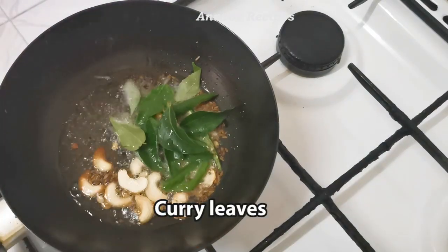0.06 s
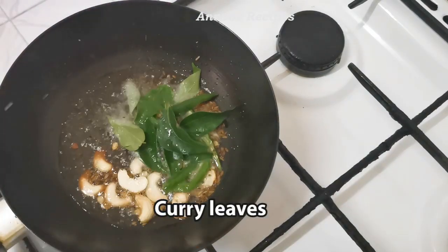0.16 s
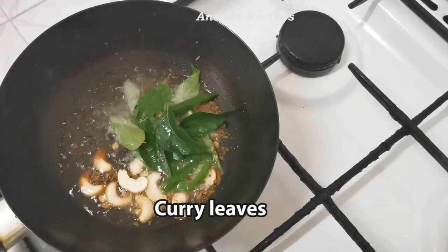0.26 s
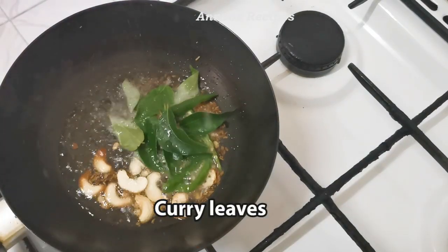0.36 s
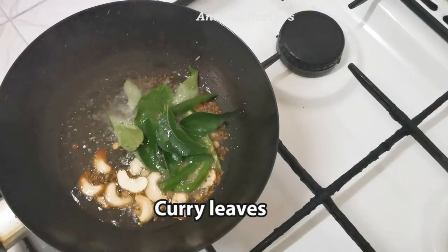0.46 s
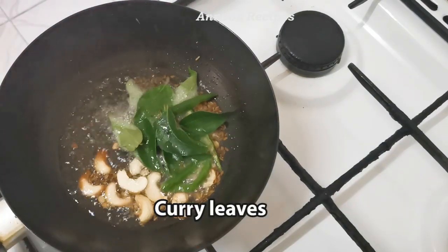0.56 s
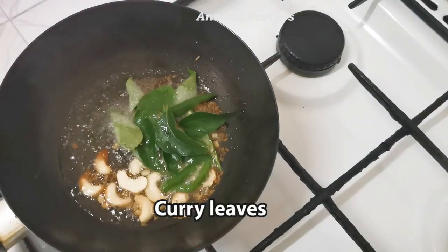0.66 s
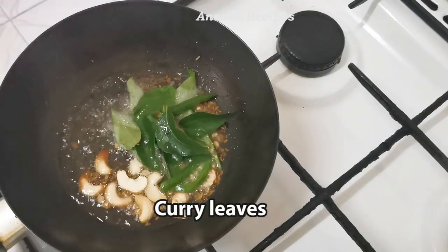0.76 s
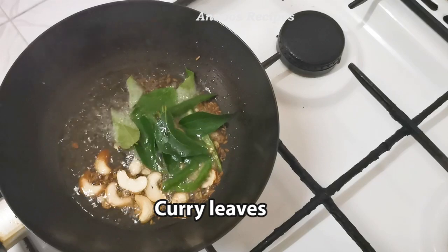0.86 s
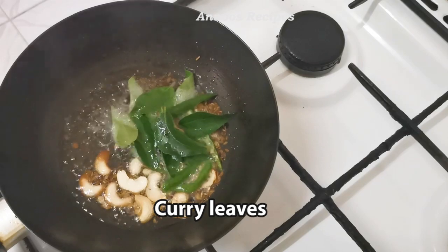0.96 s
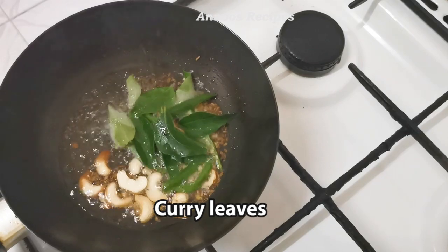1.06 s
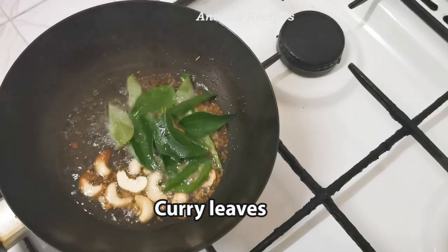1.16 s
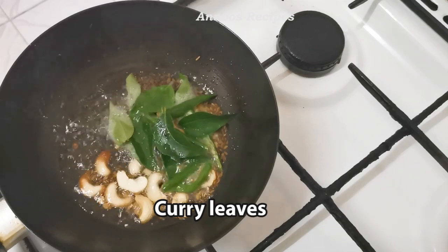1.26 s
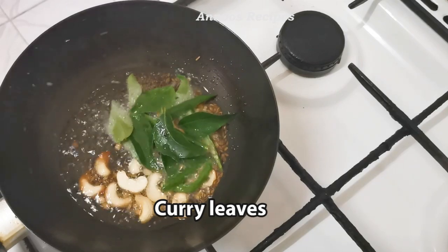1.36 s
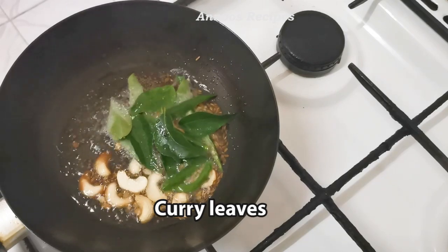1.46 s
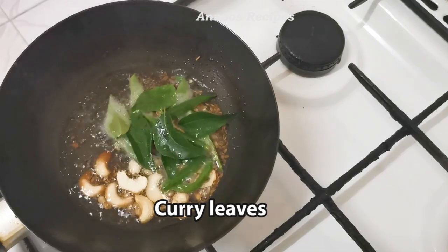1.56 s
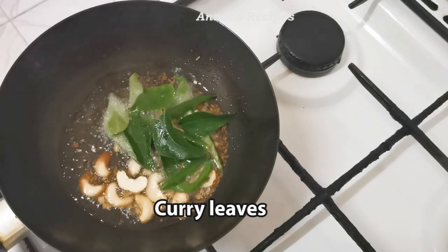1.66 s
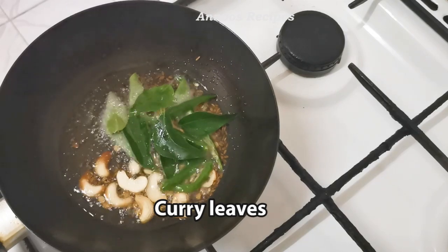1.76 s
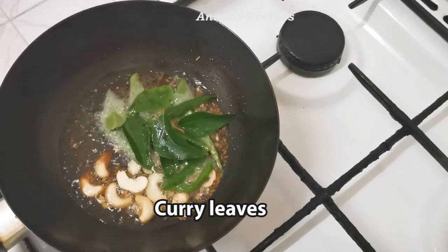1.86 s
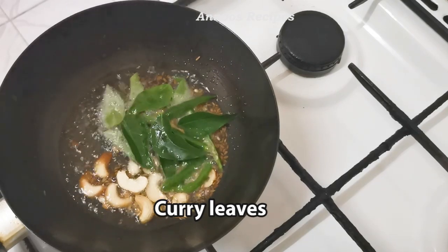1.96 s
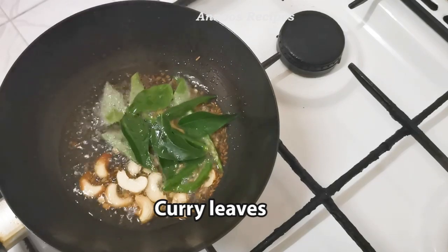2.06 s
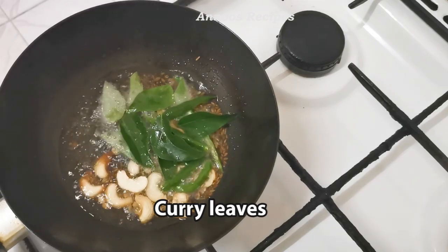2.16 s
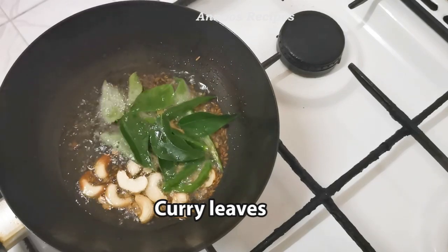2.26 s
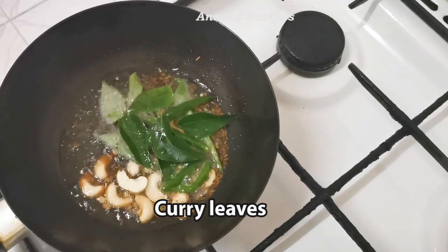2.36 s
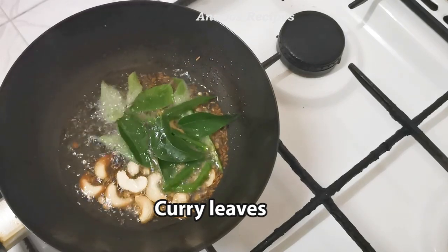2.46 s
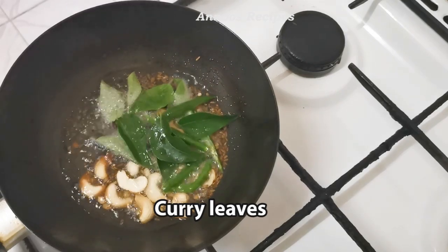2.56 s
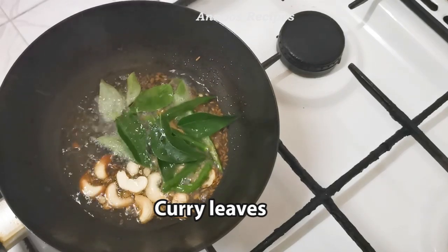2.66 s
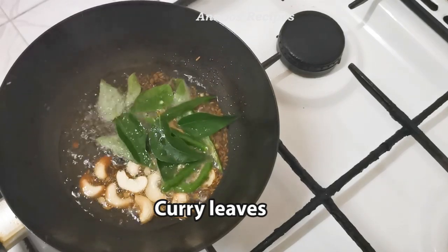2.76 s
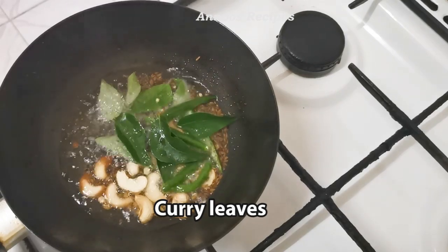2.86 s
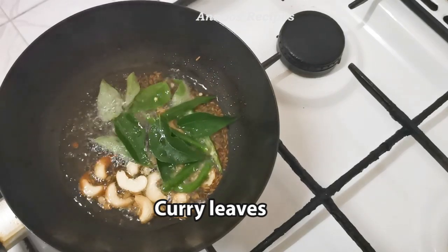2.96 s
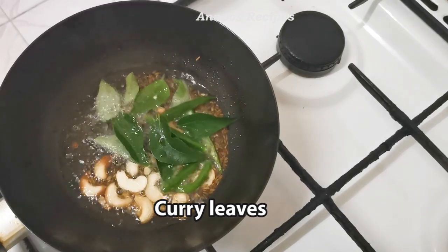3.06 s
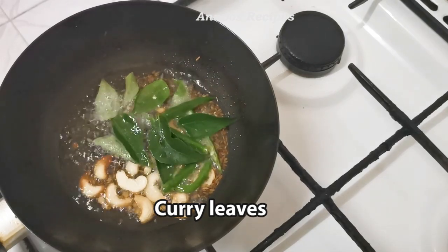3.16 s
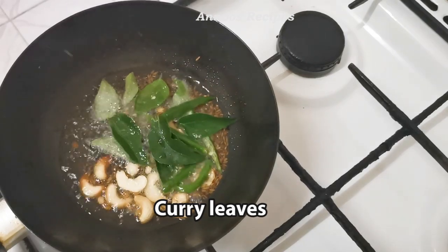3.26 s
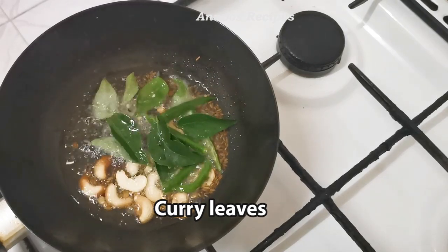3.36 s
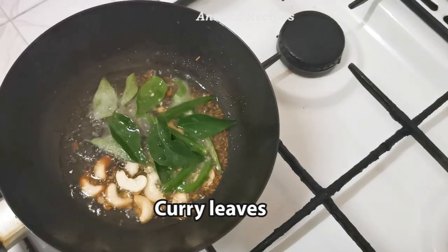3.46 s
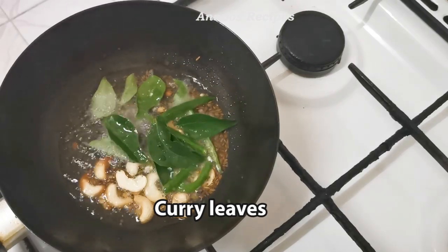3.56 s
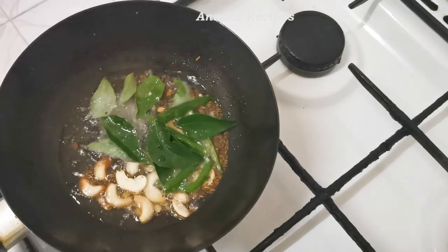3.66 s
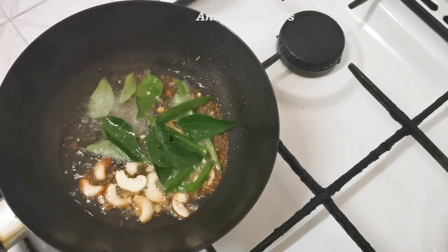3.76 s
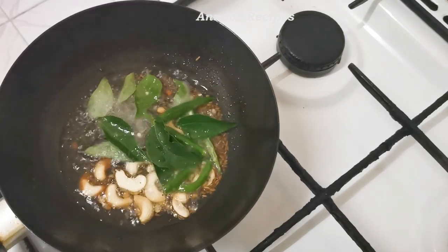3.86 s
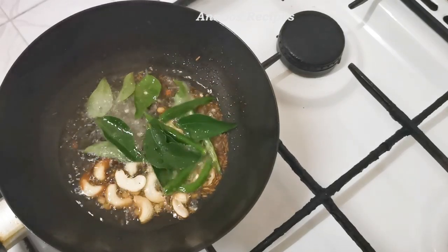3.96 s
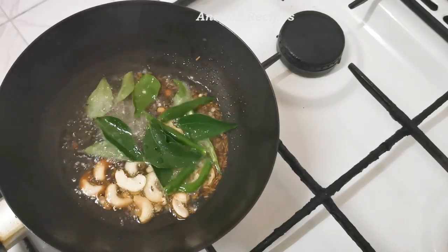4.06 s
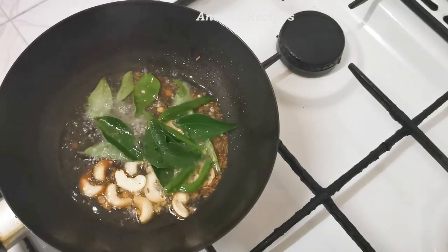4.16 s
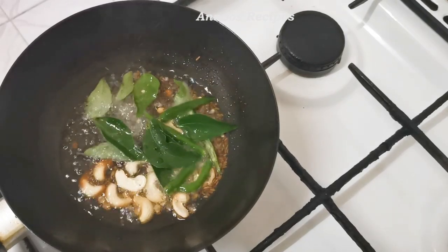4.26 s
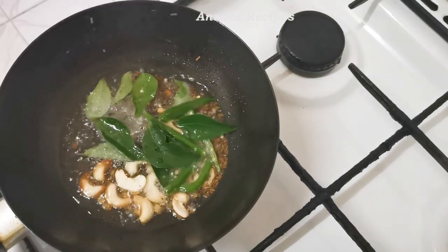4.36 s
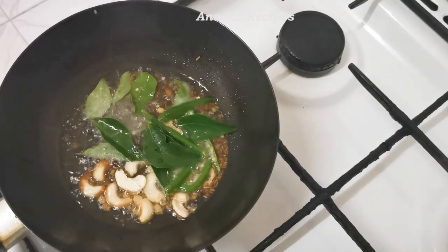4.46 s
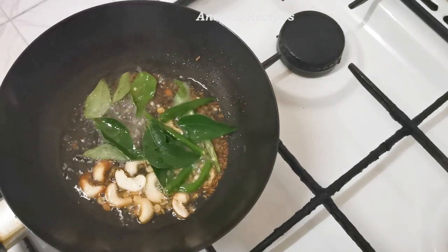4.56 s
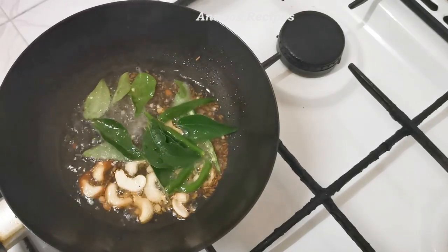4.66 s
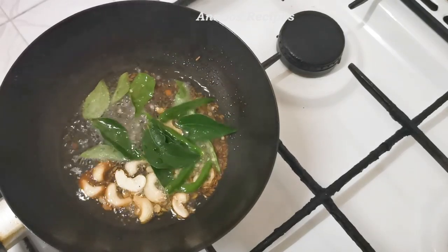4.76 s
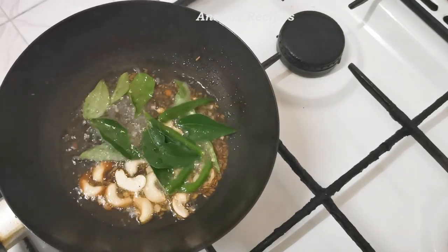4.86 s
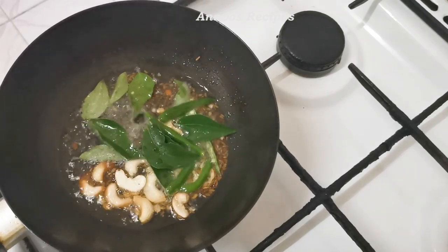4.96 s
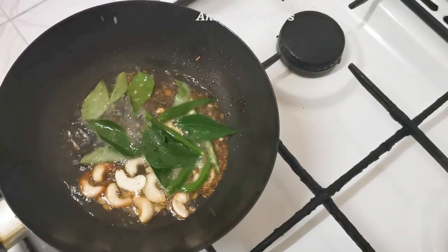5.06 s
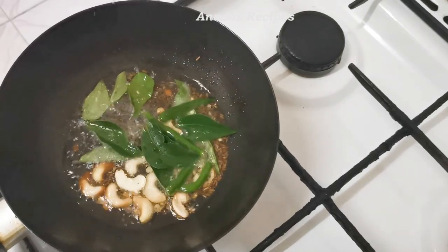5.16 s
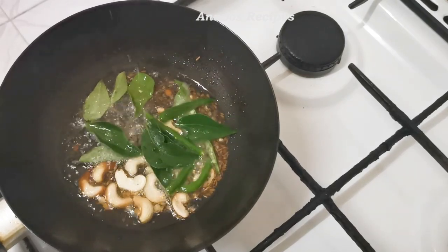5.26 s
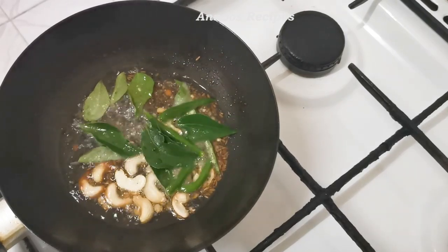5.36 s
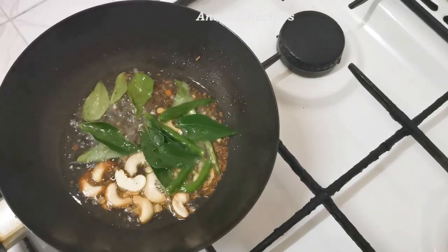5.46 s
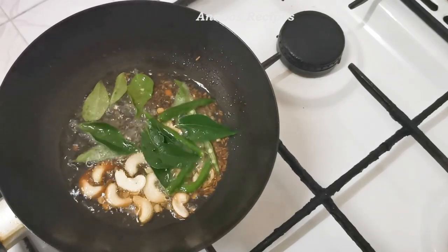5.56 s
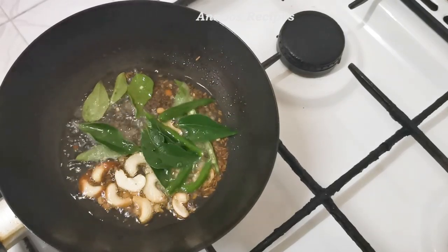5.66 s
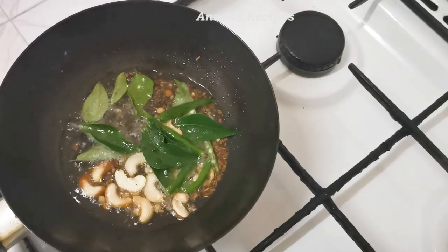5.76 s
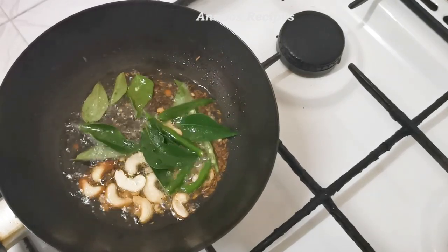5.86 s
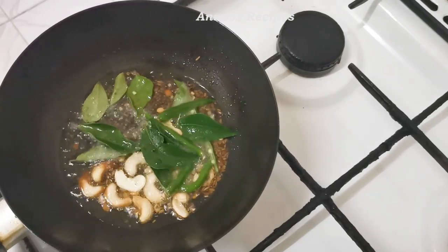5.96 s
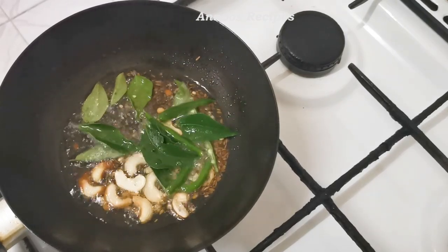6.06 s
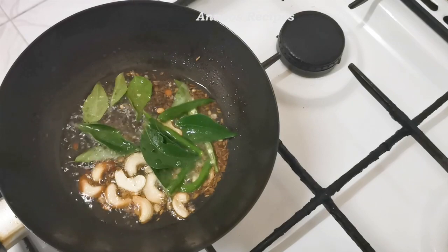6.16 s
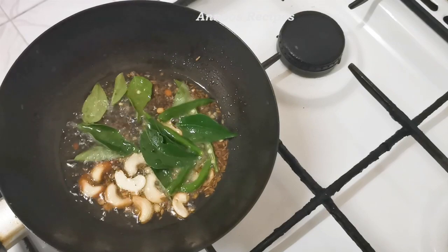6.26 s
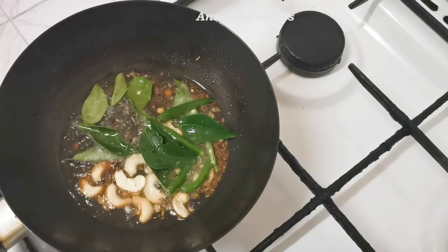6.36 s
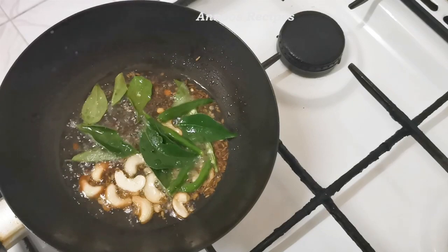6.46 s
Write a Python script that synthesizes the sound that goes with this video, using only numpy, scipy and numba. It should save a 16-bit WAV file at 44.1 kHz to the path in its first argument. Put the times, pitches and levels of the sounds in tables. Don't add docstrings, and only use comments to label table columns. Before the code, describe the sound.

Very close stereo sound of hot oil in a bowl-shaped pan. Moist leaves seethe strongly, then gradually dry, leaving a quieter, grainier sizzle. Random cracks, dull pops and spitting droplets jump out throughout, some thudding against the microphones. Short reflections from the pan and tiles surround them, with an extremely faint, wavering appliance hum underneath.

```python
import sys
import numpy as np
from scipy import signal
from scipy.fft import rfft, irfft
from scipy.io import wavfile
from scipy.ndimage import uniform_filter1d
from numba import njit

SR = 44100
rng = np.random.default_rng(int(sys.argv[2]) if len(sys.argv) > 2 else 0)


def undo_db(level):
    steps = np.asarray(level, float) / 20
    return 10 ** steps


def dump(signal):
    limited = np.clip(np.atleast_2d(signal).T, -1, 1)
    pcm = np.round(limited * 32767).astype(np.int16)
    wavfile.write(sys.argv[1], SR, pcm)


N = 288017

# [s, dB, dB]
BOILING = [(0.0, -33.5, -2.5), (0.3, -35, -0.2), (0.7, -40.5, 0.2), (1.1, -40, -1.5), (1.43, -40.5, -0.5),
           (1.75, -37, -4), (2.04, -41.5, -1.5), (2.5, -39.5, -2.5), (3.1, -39.5, -2.5), (3.5, -38, -2),
           (3.9, -43.5, 2), (4.3, -44.5, 0), (4.69, -45, 0.5), (4.9, -44, 2.5), (5.3, -50.5, 3),
           (5.51, -45, -3), (5.8, -48.5, 1.5), (6.53, -44.5, -6)]
# [s, dB]
FINE_SEETHING = [
    (0, -1),
    (2.6, 3),
    (3.0, 0.5),
    (4.3, 3),
    (4.8, -4.5),
    (6.53, 7.5),
]
# [Hz, dB]
LEFT_COLOUR = [(30, -23.5), (200, -24.5), (600, -18), (950, -1), (1280, -9.5), (1650, -1), (1950, 0),
               (2350, -6.5), (2800, 2.2), (4150, -11), (5700, -3), (7000, -12), (9900, -25), (15000, -17.5)]
RIGHT_COLOUR = [(30, -15), (300, -23), (650, -20.5), (950, -4), (1300, -7.5), (1950, 1), (2350, -3),
                (2900, 3), (4300, -3.5), (5750, 5.5), (6200, 1.5), (7700, 9), (8350, -1), (11500, -20)]
# [s, dB, s]
DRONE_SWELLS = [
    (0.315, -62, 0.085),
    (1.7, -72, 0.12),
    (2.0, -65.5, .08),
    (2.394, -75, 0.16),
    (3.12, -62, 0.05),
    (3.655, -62.5, 0.071),
    (3.92, -69, .12),
    (5.403, -74.5, 0.14),
    (5.67, -71, .07),
    (6.53, -60, 0.035),
]
# [s, dB, Hz, dB]
OPEN_CRACKS = [(.061, -24, 1500, -32), (.1106, -29, 2660, -16.5), (0.1839, -23, 2020, -13),
               (0.294, -27, 2940, -17), (0.4331, -22, 1630, -35), (.528, -23.5, 2700, -16),
               (1.175, -30, 1650, -30), (1.278, -29.5, 2590, -30), (1.4706, -23.5, 3200, -17.5),
               (1.5658, -33, 2940, -15.5), (1.8057, -24.5, 2980, -28), (1.8878, -22.5, 2780, -26),
               (2.1774, -25.5, 2670, -9), (2.2936, -23.5, 2950, -19), (2.3826, -20.5, 1670, -26),
               (2.4714, -29, 1950, -16.5), (2.5005, -23, 1640, -16), (2.8481, -23, 2160, -24),
               (2.9043, -39, 2900, -11.5), (3.1838, -23, 2190, -12), (3.2942, -24, 1690, -17),
               (3.3468, -24, 2120, -16), (3.6865, -23.5, 2090, -16), (4.485, -16.5, 1760, -19),
               (4.5908, -27, 2950, -15.5), (4.8296, -20, 1580, -23.5), (5.2158, -28.5, 2920, -23),
               (5.8958, -28, 3110, -20), (6.0716, -29.5, 2760, -18), (6.1766, -30, 2560, -18)]
# [s, dB, Hz, cycles]
LEAF_POPS = [(0.3532, -21.5, 1530, 0.47), (0.4515, -23, 2190, 0.74), (0.9565, -24.5, 2400, 1.1),
             (1.0621, -25, 3190, 0.91), (1.3342, -26.5, 2660, 1.9), (1.6794, -24.5, 2700, 0.78),
             (1.799, -25, 2670, 1.5), (1.912, -26, 1440, 0.64), (2.5937, -21, 2270, 1.5),
             (2.877, -23.5, 1590, 0.47), (3.1377, -21.5, 1970, 1), (3.1465, -33, 1890, 0.7),
             (3.1768, -32, 2420, 0.59), (3.2855, -22.5, 1700, .9), (3.6558, -23.5, 1960, 0.95),
             (3.942, -22.5, 1650, 0.33), (4.1253, -22.5, 1900, 1.1), (4.5047, -30, 2200, 1.6),
             (4.5466, -27, 3250, 0.79), (4.7045, -31.5, 2020, 3.1), (4.7758, -27, 1610, 0.71),
             (4.807, -27.5, 1640, 0.65), (5.0834, -29, 2400, 1.4), (5.2816, -26, 2540, 1.4),
             (5.505, -25, 2600, 1.7), (5.5973, -29.5, 2020, .9), (5.7386, -29.5, 2760, 0.82),
             (5.9703, -28.5, 2010, 0.73), (6.2522, -27, 1610, 1.1), (6.4953, -28, 1900, 1.1)]
# [s, dB, dB]
DROPLET_SPITS = [(0.235, -11, -42), (.469, -16.5, -47), (4.0989, -24.5, -50), (.729, -17, -51),
                 (1.0674, -30, -40), (1.4106, -15.5, -47), (1.5225, -20.5, -57), (1.7457, -18, -57),
                 (2.0395, -19.5, -44), (2.0624, -18.5, -48), (2.478, -15, -53), (2.7819, -27, -59),
                 (2.8907, -21.5, -65), (3.0483, -19.5, -66), (3.177, -16, -63), (3.611, -18, -60),
                 (3.8645, -19, -50), (4.2203, -20.5, -54), (4.232, -19, -54), (4.0993, -25, -56),
                 (4.7093, -24, -57), (4.9723, -21.5, -56), (5.2005, -21.5, -42), (5.3048, -20, -52),
                 (5.458, -21, -49), (5.6402, -24, -52), (5.764, -26, -50), (5.8332, -20.5, -60),
                 (6.335, -20.5, -42), (6.382, -30, -51)]
# [s, dB, dB]
SPRAY_TICKS = [(0.1092, -42, 3), (0.1824, -42, -0.5), (0.2934, -43, -1.5), (0.3376, -39, 0),
               (0.3721, -39, -2.5), (0.5267, -42, -12), (0.6265, -40, -5), (0.7756, -42, -6.0),
               (1.2755, -43, -1), (1.3723, -43, -2.5), (1.3922, -44, -4.0), (1.649, -44, -10),
               (1.8861, -44, -4.5), (2.176, -41, -5), (2.2922, -42, -5.0), (2.9033, -39, -8),
               (3.1832, -48, -26), (3.3792, -48, -5), (4.0976, -46, 7), (4.5126, -49, -2.5),
               (4.59, -55, -4.5), (4.7376, -47, -9), (4.828, -48, -17), (4.8993, -47, -5.5),
               (4.9124, -47, -5.0), (5.018, -47, -4.5), (5.2145, -52, -7.0), (5.4624, -52, -2.5),
               (5.5952, -50, -10), (6.0701, -54, -15)]
# [s, dB, dB]
MEMBRANE_JOLTS = [(.235, -63, -42), (0.34, -37, -58), (0.374, -36, -46), (0.529, -60, -38.5),
                  (.628, -41, -44), (1.410, -68, -45), (2.064, -59, -42), (2.177, -30, -14),
                  (2.905, -62, -31), (3.688, -62, -48), (4.099, -25, -51), (4.514, -32, -45),
                  (4.592, -54, -33), (6.178, -72, -37)]

BUBBLES, DRYING = 26000, .45
DRONE_HZ, DRONE_REST_DB = 140.6, -81
STRAYS, STRAY_HZ, STRAY_SPAN_HZ = 170, 1630, 1500
STRAY_POP_DB, STRAY_SPIT_DB, STRAY_SPREAD_DB = 10, 16.5, 17.5
CRACK_CYCLES, STRAY_CYCLES = 0.51, 1.3
OTHER_PART_DB, TOP_DB = -11.5, -36


def level(x, db):
    return x * undo_db(db) / np.sqrt(np.mean(x ** 2))


def curve(table):
    s, *columns = np.transpose(table)
    t = np.arange(N) / SR
    return [np.interp(t, s, column) for column in columns]


def walk(rate):
    hold = int(SR / rate)
    held = np.repeat(rng.standard_normal(N // hold + 1), hold)[:N]
    return 1.62 * uniform_filter1d(uniform_filter1d(held, hold), hold)


def above(x, hz):
    return signal.sosfilt(signal.butter(3, hz, "high", fs=SR, output="sos"), x)


@njit
def ring(start, hz, cycles, size, glide, rise):
    out = np.zeros((2, N))
    for c in range(2):
        for k in range(len(hz)):
            i = int(start[c, k]) + 1
            late = i - start[c, k]
            w = 2 * np.pi * hz[k] / SR
            fade = hz[k] / SR / cycles[k]
            z = size[c, k] * np.exp((1j * w - fade) * late)
            p = np.exp(1j * w - fade)
            turn = np.exp(1j * w * fade * glide)
            shut = np.exp(-rise * fade * late)
            opening = np.exp(-rise * fade)
            for n in range(i, min(N, i + int(6 / fade))):
                out[c, n] += z.imag * (1 - shut)
                z *= p
                p *= turn
                shut *= opening
    return out


def ports(s, side, lag, pan_db):
    pair = np.array([[1.], [-1.]])
    start = np.maximum(s * SR + 1 + pair * (.05 - lag * side), 0)
    return start, undo_db(pair * pan_db / 2)


def sizzle(scatter_db=3.0, patchy_db=1.16):
    boil_db, bright_db = curve(BOILING)
    when, pitch, life, side, luck = rng.random((BUBBLES, 5)).T
    at = (when * (N - 1)).astype(int)
    hz = 150 + 16000 * pitch ** 1.6
    cycles = 0.26 + 2.86 * life ** 1.92
    db = np.minimum(-scatter_db * np.log(luck) * (1 + DRYING * when), 16)
    db += patchy_db * walk(45)[at]
    db -= scatter_db * 1.9 * DRYING * when
    db += bright_db[at] * (hz > 4000)
    db += curve(FINE_SEETHING)[0][at] * (np.abs(hz - 5750) < 700)
    size = undo_db(db) * np.sqrt(hz / cycles * pitch ** .6)
    across = 2 * side - 1
    start, gain = ports(when * N / SR, across, lag=.85, pan_db=3.5 * across)
    fizz = ring(start, hz, cycles, size * gain, 0.11, 2.7)
    hiss = rng.standard_normal(N) + .5 * rng.standard_normal((2, N))
    return (level(fizz, 0) + level(hiss, -11)) * undo_db(boil_db)


def kitchen(x, t60, wet_db, alike, count=6):
    t = np.arange(int(.12 * SR)) / SR
    spot = np.repeat(rng.integers(0, count, N // 128 + 1), 128)[:N]
    out = x
    for k in range(count):
        grain = alike * rng.standard_normal(len(t)) + rng.standard_normal((2, len(t)))
        tail = grain * np.exp(-np.log(1000) * t / t60) * (t > .0005)
        tail *= undo_db(wet_db) / np.sqrt(np.sum(tail ** 2, axis=1, keepdims=True))
        out = out + signal.oaconvolve(x * (spot == k), tail, axes=1)[:, :N]
    return out


def response(table, size=1024):
    hz, db = np.transpose(table)
    f = np.maximum(np.arange(size // 2 + 1) * SR / size, 1)
    gain = undo_db(np.interp(np.log(f), np.log(hz), db))
    cepstrum = irfft(np.log(gain))
    cepstrum[1:size // 2] *= 2
    cepstrum[size // 2 + 1:] = 0
    return irfft(np.exp(rfft(cepstrum)))[:size // 2]


def drone():
    phase = 2 * np.pi * np.cumsum(DRONE_HZ * (1 + 0.0123 * walk(4.4))) / SR
    t = np.arange(N) / SR
    swell = undo_db(DRONE_REST_DB)
    for s, db, half in DRONE_SWELLS:
        swell = swell + undo_db(db) * np.exp(-.5 * ((t - s) / half) ** 2)
    tone = np.sqrt(2) * np.sin(phase) * swell * undo_db(1.5 * walk(18))
    air = rng.standard_normal(N) + 0.3 * rng.standard_normal((2, N))
    air = air * undo_db(2.5 * walk(4.93))
    band = signal.butter(1, [18, 200], "band", fs=SR, output="sos")
    return tone + level(signal.sosfilt(band, air), -68.5)


def pockets():
    when, pop, spit, pitch, life = rng.random((STRAYS, 5)).T
    boil_db = curve(BOILING)[0][(when * (N - 1)).astype(int)]
    pop_db = boil_db + STRAY_POP_DB - STRAY_SPREAD_DB * pop
    spit_db = boil_db + STRAY_SPIT_DB - STRAY_SPREAD_DB * spit
    hz = STRAY_HZ + STRAY_SPAN_HZ * pitch
    cycles = STRAY_CYCLES * (.5 + life)
    strays = [when * N / SR, pop_db, hz, cycles, spit_db, spit_db + TOP_DB + 7.5]
    rows = [(s, db, hz, CRACK_CYCLES, spit, spit + TOP_DB) for s, db, hz, spit in OPEN_CRACKS]
    rows += [(s, db, hz, cycles, db + OTHER_PART_DB, db + TOP_DB) for s, db, hz, cycles in LEAF_POPS]
    rows += [(s, db + OTHER_PART_DB - 5.0, 2500., CRACK_CYCLES, db, top - 3.1) for s, db, top in DROPLET_SPITS]
    return np.hstack([np.transpose(rows), strays])


def bursts():
    s, pop_db, hz, cycles, spit_db, top_db = pockets()
    side, life, pitch = rng.random((len(s), 3)).T
    start, gain = ports(s - .00015, 2 * side - 1, lag=0.64, pan_db=4.8 * (2 * side - 1.5))
    flat = np.ones(len(s))
    pop = ring(start, hz, cycles, undo_db(pop_db + 10.0) * gain, 0.0065, 2.56)
    pop += ring(start, 0.6 * hz, 0.28 * flat, undo_db(pop_db + 8.0) * gain, 0., 6.4)
    spit = ring(start, 6200 + 1800 * pitch, 1.0 * flat, undo_db(spit_db + 12.5) * gain, 0., 1.0)
    top = ring(start, 11000 + 3500 * life, 0.71 * flat, undo_db(top_db + 21) * gain ** 4, 0., 2.5)
    return pop + above(spit, 2800), above(top, 7100)


def ticks():
    s, db, pan_db = np.transpose(SPRAY_TICKS)
    start, gain = ports(s + .0009, np.tanh(pan_db / 10), lag=0.77, pan_db=pan_db)
    hz = 11000 + 3500 * rng.random(len(s))
    rings = ring(start, hz, np.full(len(s), .71), undo_db(db + 25.0) * gain, 0., 2.5)
    return above(rings, 7500)


def jolts(settle_s=.0028, recover_s=.05, throw_s=.00015):
    s, *db = np.transpose(MEMBRANE_JOLTS)
    kicks = np.zeros((2, N))
    kicks[:, (s * SR).astype(int)] = undo_db(np.array(db) + 4.5)
    t = np.arange(int(.4 * SR)) / SR
    shape = settle_s / recover_s * np.exp(-t / recover_s) - np.exp(-t / settle_s)
    shape *= 1 - np.exp(-t / throw_s)
    front = 2.8 * t / .00015 * np.exp(-t / .00015)
    return signal.oaconvolve(kicks, (shape + front)[None], axes=1)[:, :N]


def scene():
    colour = np.array([response(LEFT_COLOUR), response(RIGHT_COLOUR)])
    body, top = bursts()
    oil = kitchen(sizzle() * undo_db(6) + body, t60=0.096, wet_db=-7.0, alike=1.0)
    coloured = signal.oaconvolve(oil, colour, axes=1)[:, :N]
    return above(coloured, 42) + top + ticks() + jolts() + drone()


@njit
def follow(x, attack, release):
    out, e = np.empty(len(x)), 0.
    for i in range(len(x)):
        e += (x[i] - e) * (attack if x[i] > e else release)
        out[i] = e
    return out


def roll_off(x):
    return signal.sosfilt(signal.butter(12, 16470, fs=SR, output="sos"), x)


def record(dry, knee_db=-26, share=0.37, attack_s=0.00036, release_s=0.24):
    peak = follow(np.abs(dry).max(axis=0), 1 / (attack_s * SR), 1 / (release_s * SR))
    gain = np.minimum(undo_db(knee_db) / (peak + 1e-9), 1) ** share
    gain = uniform_filter1d(gain, size=45)
    ducked = dry * np.concatenate([np.ones(50), gain[:-50]])
    low_pass = signal.ellip(8, .3, 60, 15050, fs=SR, output="sos")
    kept = signal.sosfilt(low_pass, ducked)
    mix = kept + undo_db(-37) * (ducked - kept)
    return roll_off(mix)


dry = scene()
out = record(dry)
dump(out)
```